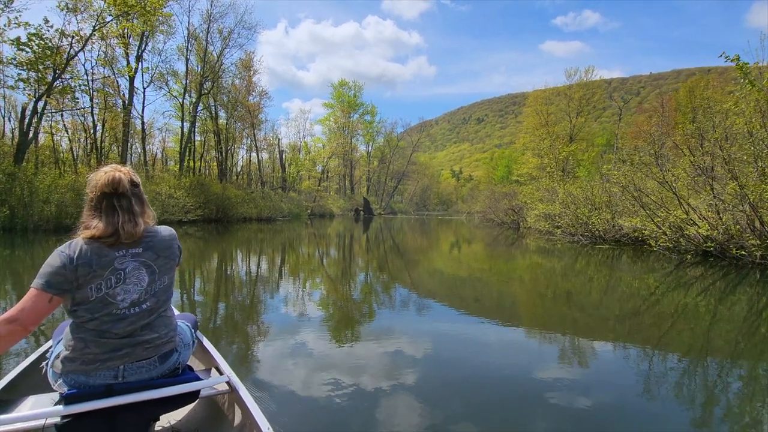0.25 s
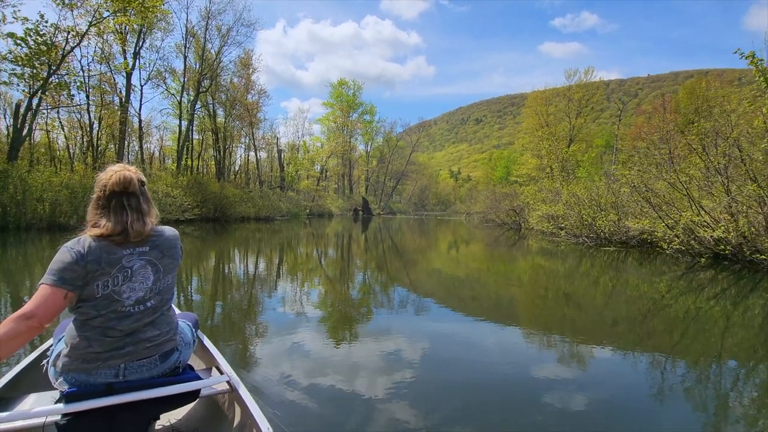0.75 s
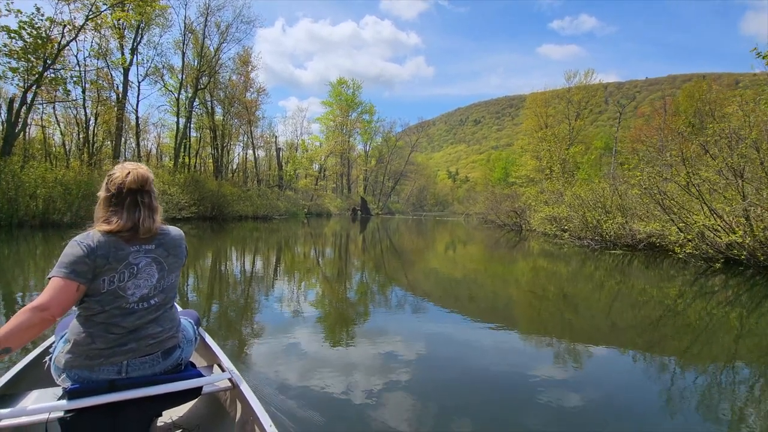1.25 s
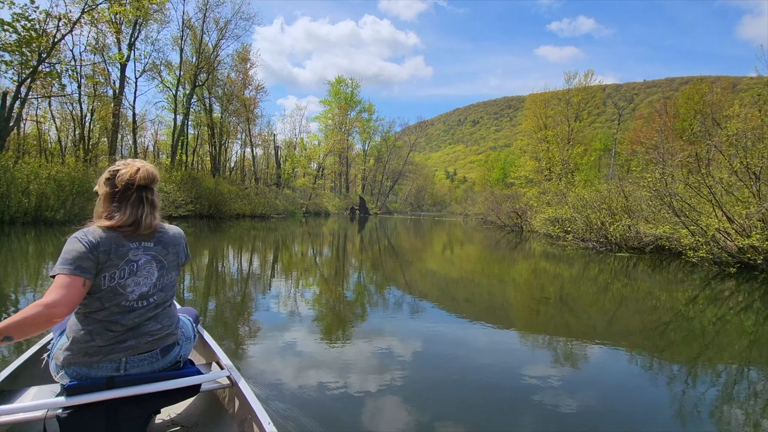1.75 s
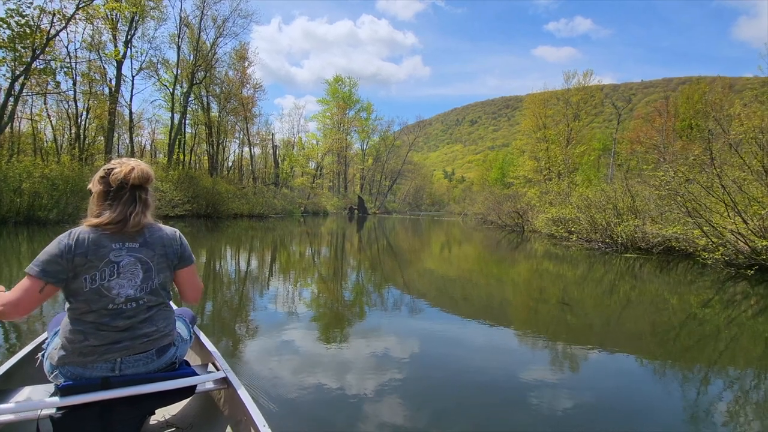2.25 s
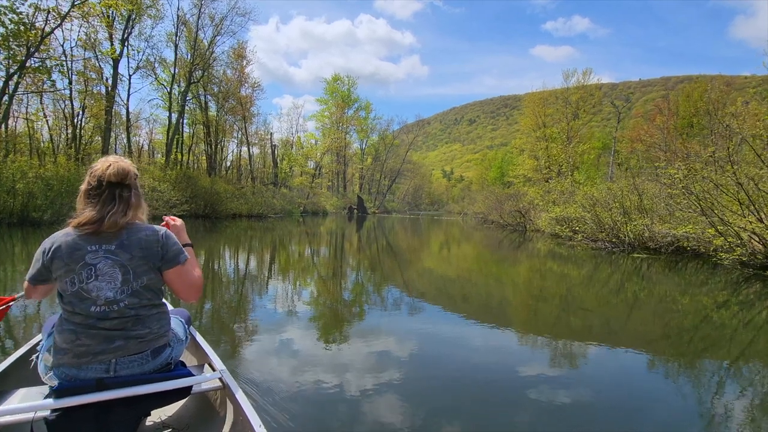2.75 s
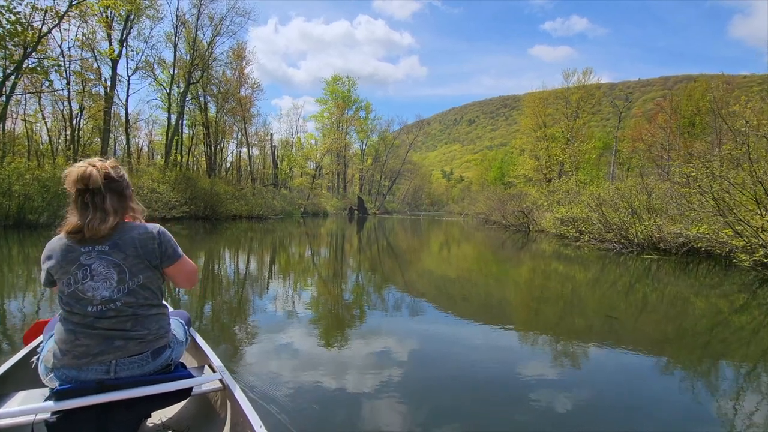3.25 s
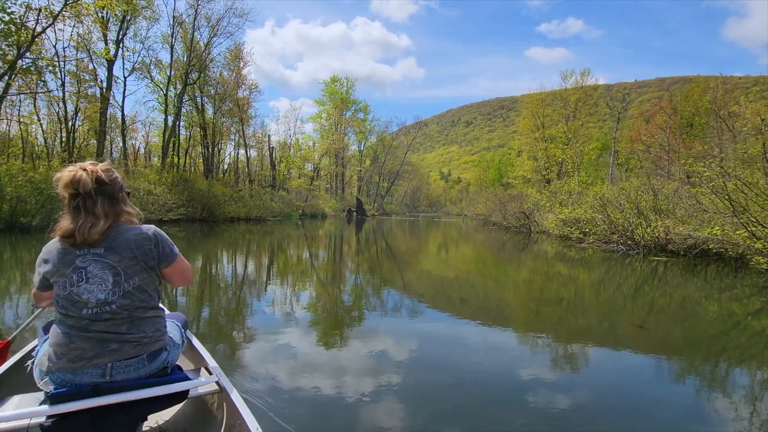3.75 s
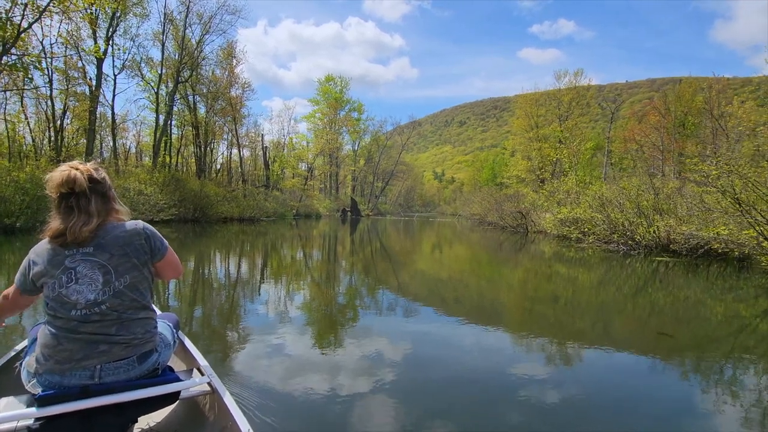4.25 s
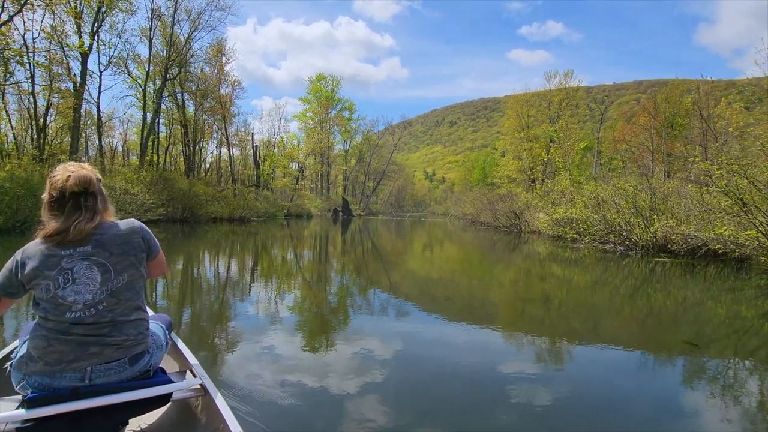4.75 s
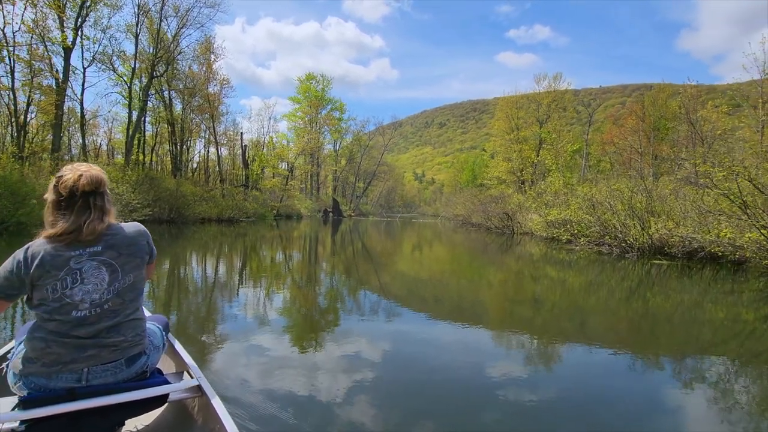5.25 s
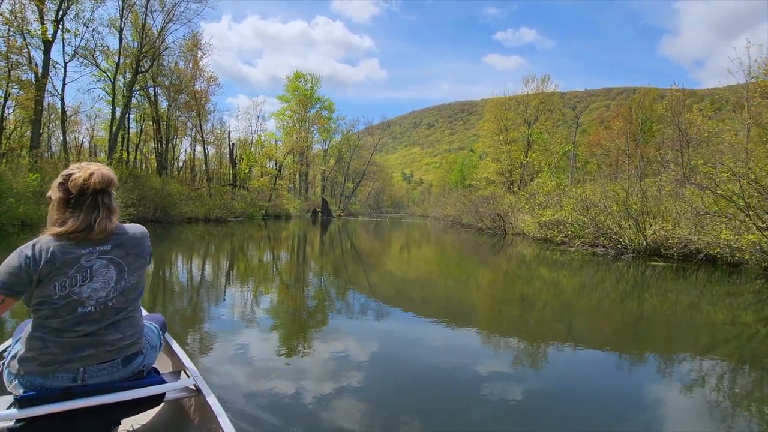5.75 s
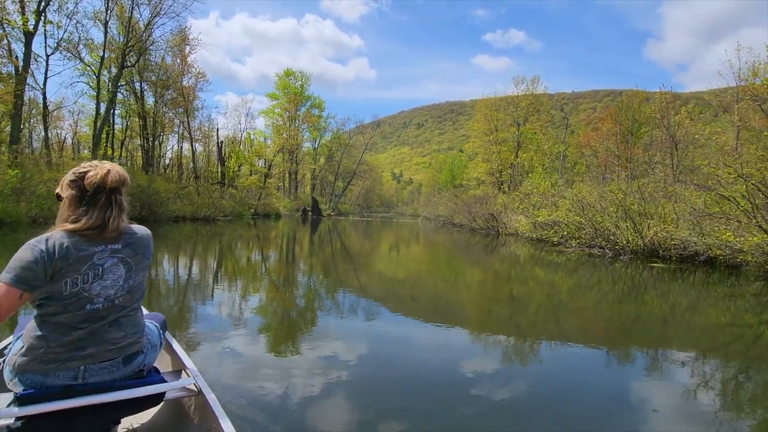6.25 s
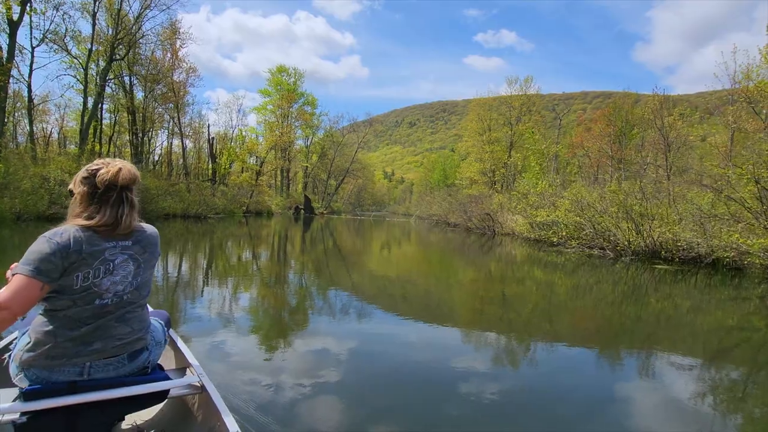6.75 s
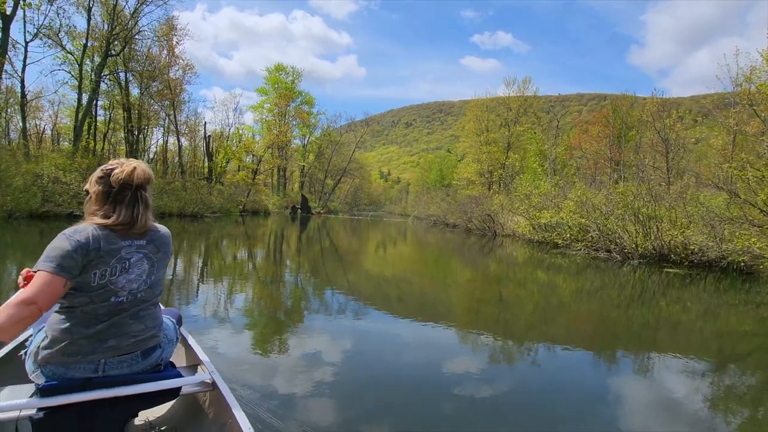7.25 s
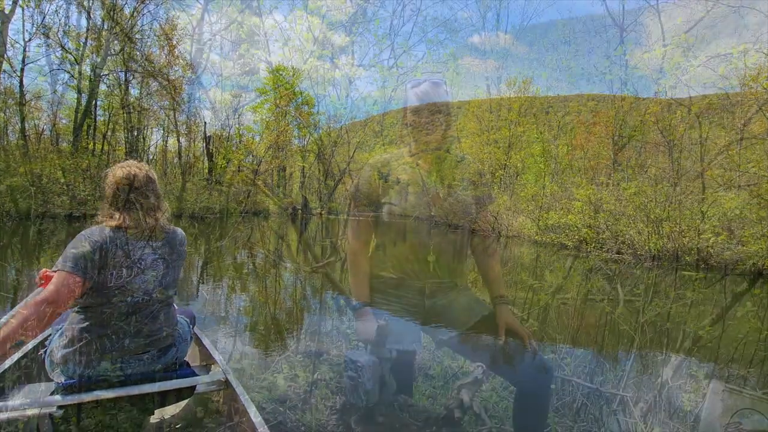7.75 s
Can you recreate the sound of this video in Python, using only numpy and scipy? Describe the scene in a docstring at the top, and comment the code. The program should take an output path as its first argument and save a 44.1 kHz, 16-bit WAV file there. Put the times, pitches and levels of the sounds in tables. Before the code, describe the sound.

A close sparrow sings chips, whistles and buzzes over a quiet creek, a farther blackbird rasps a trill, then low wind rumbles on the microphone.

```python
"""A sparrow sings close by on the right of a still creek between wooded banks, where a canoe drifts in spring.
Its notes are pitch-arced sines and two-pitch buzzes; a farther blackbird trills and chucks, small birds answer,
and all ring in the trees by convolution with scattered echoes and a dying noise tail.
Drops ring as bubbles and ticks crack at the paddle; gusts of low noise rumble on the microphone,
strongest near the end, over the valley's steady noise hush."""
import sys
import numpy as np
from scipy import signal
from scipy.fft import rfft, irfft, next_fast_len
from scipy.io import wavfile
from scipy.ndimage import uniform_filter1d

SR = 44100
rng = np.random.default_rng(int(sys.argv[2]) if len(sys.argv) > 2 else 0)


def store_wav(level_fs):
    """Save 16-bit WAV to argv[1]."""
    pcm = np.round(np.clip(np.atleast_2d(level_fs), -1, 1) * 32767)
    wavfile.write(sys.argv[1], SR, pcm.T.astype(np.int16))


N = 353108
TIME = np.arange(N) / SR

# Table levels are ahead of any pan and direct/echo gain; balance is left minus right.


def from_db(db):
    """Decibels to amplitude gain."""
    return 10 ** (np.asarray(db) / 20)


def rms_one(x):
    """Scale to unit power."""
    return x / np.sqrt(np.mean(x ** 2) + 1e-20)


def in_time(rows):
    """Interpolate (t/s, value) rows at every sample."""
    return np.interp(TIME, *np.transpose(rows))


def add(out, start_s, sound):
    """Mix a sound in, starting at start_s and cut at the end."""
    at = max(round(start_s * SR), 0)
    out[..., at:at + sound.shape[-1]] += sound[..., :max(N - at, 0)]


def panned(x, side_db):
    """Split the left-minus-right level difference evenly between the sides."""
    return x * from_db(np.array([[.5], [-.5]]) * side_db)


def placed(x, side_db, lead_ms):
    """A point source reaches the left port lead_ms earlier, and the two ports with unequal strength."""
    right = np.roll(x, round(lead_ms * SR / 1000))
    return panned(np.array([x, right]), side_db)


def coloured(x, spectrum):
    """Filter by (f/Hz, gain/dB) rows, falling off beyond both ends; rms 1."""
    hz, db = np.transpose(spectrum)
    size = next_fast_len(x.shape[-1])
    bins_hz = np.maximum(np.fft.rfftfreq(size, 1 / SR), 1)
    gain = from_db(np.interp(np.log(bins_hz), np.log(hz), db))
    gain *= np.minimum(bins_hz / hz[0], 1)
    gain *= np.minimum(hz[-1] / bins_hz, 1) ** 2
    return rms_one(irfft(rfft(x, size) * gain, size)[..., :x.shape[-1]])


def stereo_noise(spectrum, alike):
    """Coloured noise; the two sides share the fraction alike of its power before filtering."""
    white = rng.standard_normal((3, N))
    return coloured(np.sqrt(alike) * white[2] + np.sqrt(1 - alike) * white[:2], spectrum)


def waver(t, per_s):
    """Straight lines between unit-normal knots, per_s a second; holds the last of 512."""
    knots = rng.standard_normal(size=512)
    return np.interp(t * per_s, np.arange(len(knots)), knots)


def note_clock(length_s):
    """Seconds into a note, and the share of it that has passed."""
    t = np.arange(int(length_s * SR)) / SR
    return t, t / length_s


def swell(u, edge):
    """Sine-squared opening and closing, each over the share edge of a note."""
    return np.sin(np.pi / 2 * np.clip(np.minimum(u, 1 - u) / edge, 0, 1)) ** 2


def whistle(length_s, start_hz, middle_hz, end_hz, edge, unsteady):
    """A pure tone, rms 1, whose pitch follows a parabola through three points, with random quaver."""
    t, u = note_clock(length_s)
    arc = np.polyfit([0, .5, 1], [start_hz, middle_hz, end_hz], 2)
    hz = np.polyval(arc, u) * (1 + unsteady * waver(t, 250))
    return rms_one(swell(u, edge) * np.sin(2 * np.pi * np.cumsum(hz) / SR))


def buzz(length_s, start_hz, end_hz, swing_hz, pulse_hz, jitter, rasp, edge, overtone_db):
    """In each pulse the voice opens on a high pitch, flips to a low one and fades; rms 1."""
    t, u = note_clock(length_s)
    cycle = np.cumsum(pulse_hz * (1 + jitter * waver(t, 80))) / SR % 1
    flip = np.tanh(11 * (.5 - cycle))
    # level dips at the flip; the high half is the louder
    pulse = np.sin(np.pi * cycle) * (1 - .6 * (1 - flip ** 2)) * (1 + .15 * flip)
    swing = 0.79 * flip + .5 - cycle + rasp * waver(t, 900)
    hz = start_hz + (end_hz - start_hz) * u + swing_hz * swing
    phase = 2 * np.pi * np.cumsum(hz) / SR
    tone = np.sin(phase) + from_db(overtone_db) * np.sin(2 * phase)
    return rms_one(swell(u, edge) * pulse * tone)


def woods(x, t60_s, early_db):
    """Trunks and twigs scatter a sound: eight early echoes a side and a dense dying tail, cut at 1 s."""
    t = np.arange(SR) / SR
    decay = from_db(-60 * t / t60_s) * (1 - np.exp(-t / 0.0027))
    tail = rms_one(rng.standard_normal((2, SR)) * decay) / np.sqrt(SR)
    trunks = np.zeros((2, SR))
    for side in trunks:
        at = (rng.uniform(.003, .05, size=8) * SR).astype(int)
        side[at] = rng.standard_normal(size=8) / np.sqrt(8)
    return signal.fftconvolve(np.atleast_2d(x), tail + from_db(early_db) * trunks, axes=1)[:, :N]


def sparrow(buzz_fade_db=5.5, ragged_hz=750):
    """Four burr-chip-whistle phrases, then a flourish of buzzes and slurs that ends on a low buzz."""
    # phrases: chip t/s, chip level/dB, whistle delay/s, whistle length/s, whistle middle f/Hz, whistle rise/Hz
    phrases = [(1.313, -59, .02, 0.095, 7505, 120), (1.661, -52.5, 0.024, 0.075, 7330, 40),
               (1.897, -52.5, .033, .062, 7395, 348), (2.127, -53, 0.032, 0.066, 7320, 350)]
    # chip: length/s, start f/Hz, middle f/Hz, end f/Hz
    chip = (.012, 5250, 4690, 3350)
    # burr: length/s, start f/Hz, end f/Hz, pitch swing/Hz, pulse rate/Hz
    burr = (.054, 2500, 2610, 128, 109)
    # flourish tones: t/s, length/s, start f/Hz, middle f/Hz, end f/Hz, level/dB
    flourish_notes = [ (2.655, 0.04, 8230, 7460, 7230, -63), (2.687, 0.012, 6770, 5330, 4180, -59.5),
                      (2.709, .06, 5610, 5840, 5570, -55.5), (2.749, 0.011, 5700, 5380, 3520, -52),
                      (3.149, 0.035, 7700, 5900, 3600, -50.5)]
    # flourish buzzes: t/s, length/s, start f/Hz, end f/Hz, pitch swing/Hz, pulse rate/Hz, level/dB
    flourish_buzzes = [ (2.2425, .225, 4380, 4600, 610, 63.5, -57.7),
                       (2.522, 0.018, 4850, 4650, 150, 282, -58), (2.528, 0.035, 2307, 2950, 199, 261, -61),
                       (2.596, .065, 6240, 6670, 302, 200, -75.5),
                       (2.893, .155, 4380, 4380, 660, 184, -55.3),
                       (3.232, 0.17, 2470, 2340, 112, 77.4, -69)]
    # balance at the ports by pitch: f/Hz, left-right/dB
    side_by_pitch = [(2500, -11.5), (4500, -12.5), (6000, -13), (7300, -9)]
    burr_lead_s, burr_db, whistle_arch_hz = .098, -67, 106

    notes, buzzes = list(flourish_notes), list(flourish_buzzes)
    for s, db, delay_s, length_s, hz, rise_hz in phrases:
        ends_hz = hz - whistle_arch_hz   # mean of the whistle's two ends
        buzzes.append((s - burr_lead_s, *burr, burr_db))
        notes.append((s, *chip, db))
        notes.append((s + delay_s, length_s, ends_hz - rise_hz / 2, hz, ends_hz + rise_hz / 2, db))

    sung = []
    for s, length_s, start_hz, middle_hz, end_hz, db in notes:
        note = whistle(length_s, start_hz, middle_hz, end_hz, edge=0.45, unsteady=0.0062)
        sung.append((s, middle_hz, from_db(db) * note))
    for s, length_s, start_hz, end_hz, swing_hz, pulse_hz, db in buzzes:
        jitter = (pulse_hz / ragged_hz) ** 2   # fast buzzes are more ragged than slow ones
        note = buzz(length_s, start_hz, end_hz, swing_hz, pulse_hz, jitter,
                    rasp=.2, edge=.12, overtone_db=-38)
        t, u = note_clock(length_s)
        sung.append((s, start_hz, from_db(db + buzz_fade_db * (.5 - u)) * note))   # each buzz tires

    song = np.zeros((2, N))
    for s, hz, note in sung:
        side_db = np.interp(hz, *np.transpose(side_by_pitch))
        add(song, s, placed(note, side_db, lead_ms=0.24))
    echo = woods(song, t60_s=.7, early_db=-4)
    return from_db(-5.0) * song + from_db(-8.5) * panned(echo, side_db=2.5)


def blackbird():
    """A gurgle and a long rasping trill, built of overlapping two-pitch buzzes."""
    # voices: t/s, length/s, start f/Hz, end f/Hz, pitch swing/Hz, pulse rate/Hz, level/dB
    voices = [ (4.621, 0.049, 2270, 2260, 102, 155, -63), (4.755, 0.019, 4330, 4130, 720, 135.7, -57),
              (4.790, 0.62, 2776, 2689, 41.3, 61.6, -70), (4.787, 0.5, 3234, 3320, 200, 71.5, -75.5),
              (4.795, 0.89, 4855, 4820, 327, 155.3, -76), (5.601, 0.44, 4720, 4780, 542, 111.7, -70)]
    song = np.zeros(N)
    for s, length_s, start_hz, end_hz, swing_hz, pulse_hz, db in voices:
        note = buzz(length_s, start_hz, end_hz, swing_hz, pulse_hz,
                    jitter=0.09, rasp=.7, edge=0.055, overtone_db=-48)
        add(song, s, from_db(db) * note)
    direct = placed(song, side_db=-5.0, lead_ms=-.3)
    echo = woods(song, t60_s=2.5, early_db=-5.5)
    return from_db(-5.0) * direct + from_db(-3) * panned(echo, side_db=-7.0)


def chucks(start_hz=620, end_hz=480, breathy=1.0):
    """The blackbird's chucks: short ragged pulse trains, falling in pitch, and breath through its throat."""
    # calls: t/s, length/s, level/dB
    chuck_rows = [(5.177, 0.04, -60), (5.338, 0.034, -56.5), (5.547, .036, -58.5), (5.897, 0.042, -59.5)]
    # throat response: f/Hz, gain/dB
    throat = [(1000, -30), (1900, -1.5), (3000, 2.5), (4200, 8.5), (6000, -2), (7200, -18.5), (9500, -24.5),
              (13000, -57)]
    calls = np.zeros(N)
    for s, length_s, db in chuck_rows:
        t, u = note_clock(length_s)
        hz = (start_hz + (end_hz - start_hz) * u) * (1 + 0.034 * waver(t, 600))
        cycles = np.cumsum(hz) / SR
        pulses = rms_one(np.diff(np.floor(cycles), prepend=0))
        voice = coloured(pulses + breathy * rng.standard_normal(len(t)), throat)
        add(calls, s, from_db(db) * rms_one(np.sqrt(np.sin(np.pi * u)) * voice))
    direct = placed(calls, side_db=-6.0, lead_ms=-.33)
    echo = woods(calls, t60_s=.9, early_db=-11.0)
    return direct + from_db(-5.5) * panned(echo, side_db=-5)


def series(shape, rhythm, count):
    """One call repeated at an even pace, growing or fading; rows as for the lone whistles."""
    s, period_s, db, change_db, side_db = rhythm
    return [(s + k * period_s, *shape, db + k * change_db, side_db) for k in range(count)]


def far_calls():
    """Several birds call in series; one song is four dip-and-slur pairs and two plunges."""
    # call shapes: length/s, start f/Hz, middle f/Hz, end f/Hz
    hook, tsip, coo, seep = (.034, 6300, 6780, 6950), (0.013, 7300, 5800, 3800), (.22, 1760, 1820, 1910), (.034, 7450, 7470, 7520)
    dip, slur, plunge = (.04, 5200, 3900, 5100), (.042, 4200, 3100, 2300), (0.042, 6400, 4150, 2450)
    # rhythms: first t/s, period/s, first level/dB, change per call/dB, left-right/dB
    hook_rhythm, tsip_rhythm, coo_rhythm = (4.133, .418, -78.5, 5, -3), (4.678, .099, -78, 1.5, -2), (4.47, .59, -75.5, -2, -6)
    seep_rhythm, dip_rhythm = (6.026, .174, -79.5, -.3, 5), (6.058, .17, -72.5, -.4, -10)
    slur_rhythm, plunge_rhythm = (6.109, .168, -71.2, -.7, -8), (6.743, .138, -74, .5, -12)
    # lone whistles: t/s, length/s, start f/Hz, middle f/Hz, end f/Hz, level/dB, left-right/dB
    lone_whistles = [ (.038, 0.18, 4015, 3780, 3560, -82.5, -7), (1.15, 0.19, 4160, 3980, 4180, -83, -5),
                     (1.435, 0.28, 3910, 3635, 3670, -81, -2), (2.557, 0.033, 2940, 3135, 3290, -65.5, -11),
                     (4.153, .12, 2486, 2642, 2686, -74.5, -8), (4.247, 0.27, 2776, 2740, 2730, -81, -4),
                     (4.58, .017, 1500, 1440, 1430, -70.5, 5), (5.262, .17, 4714, 4542, 4536, -65.5, -9),
                     (5.633, .038, 8050, 7670, 7480, -85, 1.5), (5.705, 0.026, 5260, 5280, 4400, -70, -2),
                     (6.999, .058, 2850, 3920, 4660, -73, -12.5),
                     (7.032, .02, 4430, 3470, 2570, -73.5, -5.5)]
    callers = series(hook, hook_rhythm, count=2) + series(tsip, tsip_rhythm, count=5)
    callers += series(coo, coo_rhythm, count=3) + series(seep, seep_rhythm, count=3)
    song = series(dip, dip_rhythm, count=4) + series(slur, slur_rhythm, count=4)
    song += series(plunge, plunge_rhythm, count=2)
    return callers + song + list(lone_whistles)


def far_birds(clear_db=-64, quaver_hz=110, blur_range_db=18):
    """Thin whistles from both banks; the fainter a call, the more leaves smear it and the more it quavers."""
    clear, smeared = np.zeros((2, N)), np.zeros((2, N))
    for s, length_s, start_hz, middle_hz, end_hz, db, side_db in far_calls():
        hidden = np.clip((clear_db - db) / blur_range_db, .1, .95)
        note = whistle(length_s, start_hz, middle_hz, end_hz, edge=0.17,
                       unsteady=hidden * quaver_hz / middle_hz)
        t, u = note_clock(length_s)
        flicker = from_db(8.3 * hidden * waver(t, 180))
        note = panned(from_db(db) * rms_one(note * flicker), side_db)
        add(clear, s, np.sqrt(1 - hidden) * note)
        add(smeared, s, np.sqrt(hidden) * note)
    t, u = note_clock(.05)
    foliage = rms_one(rng.standard_normal((2, len(t))) * (1 - u) ** 2) / np.sqrt(len(t))
    calls = clear + signal.fftconvolve(smeared, foliage, axes=1)[:, :N]
    echo = woods(calls, t60_s=1.1, early_db=-5)
    return from_db(-0.5) * calls + from_db(-2.0) * echo


def paddle(rise_per_s=9, ring_cycles=49):
    """Each drop traps a bubble that rings, rises in pitch and dies; splashes are brief noise cracks."""
    # drops from the paddle: t/s, bubble start f/Hz, peak level/dB
    drop_rows = [(.077, 1940, -58.5), (2.808, 2550, -59.5), (3.19, 2560, -37.5), (3.201, 2800, -44),
                 (4.446, 2220, -47.5), (6.138, 2510, -55.5), (6.188, 2190, -53), (6.336, 2110, -59),
                 (6.453, 2000, -57), (7.171, 1760, -57), (7.193, 1690, -63), (7.781, 5000, -56.5)]
    # sharper splashes and ticks: t/s, peak level/dB
    tick_rows = [(.688, -67), (2.369, -53.5), (2.439, -63.5), (2.471, -55.5), (2.57, -59), (2.686, -59.5),
                 (3.207, -46), (4.447, -62.5), (5.998, -61), (6.93, -61), (7.6, -63)]
    # tick spectrum: f/Hz, gain/dB
    tick_colour = [(800, -16), (2500, 1.5), (5500, 5), (8000, -2), (11000, -16), (16000, -25.5)]
    drops, splashes = np.zeros(N), np.zeros((2, N))
    t, u = note_clock(0.084)
    for s, hz, db in drop_rows:
        ring = np.sin(2 * np.pi * np.cumsum(hz * (1 + rise_per_s * t)) / SR)
        decay = from_db(db - 60 * t * hz / ring_cycles)   # 60 dB down in ring_cycles of the start pitch
        add(drops, s, decay * np.tanh(t / 0.000082) ** 2 * ring)
    # a patter of faint ticks as the blade lifts
    patter = [(s, -68) for s in rng.uniform(7.52, 7.64, size=3)]
    for s, db in list(tick_rows) + patter:
        crack = coloured(rng.standard_normal((2, len(t))), tick_colour) * np.exp(-t / 0.0047)
        add(splashes, s, from_db(db) * crack / np.abs(crack).max())
    water = placed(drops, side_db=-5.5, lead_ms=0.41) + panned(splashes, side_db=8.5)
    return water + from_db(-17.0) * woods(water, t60_s=0.27, early_db=-5.0)


def wind(flutter_db=3, flutter_per_s=22, calm_eddy_db=-76, eddy_share_db=-22.5):
    """A fluttering breeze and single puffs buffet the microphone and shed smaller, higher eddies at each port."""
    # breeze, ahead of flutter: t/s, level/dB
    breeze_db = [(0, -61), (.4, -61), (.95, -52.5), (1.6, -68), (3.5, -68.5), (4.05, -58), (4.25, -68.5),
                 (5.55, -64), (5.92, -46), (6.38, -54), (7.05, -45), (7.78, -44.5), (8, -56.5)]
    # puffs: centre t/s, length/s, buffet level/dB, eddy level/dB
    puffs = [(0.305, 0.052, -53, -77), (0.884, 0.11, -49.5, -69), (5.075, 0.067, -56.5, -77),
             (6, 0.072, -37.5, -55), (6.155, .12, -48.5, -51), (6.485, 0.076, -41.5, -55.5),
             (6.616, 0.029, -42.5, -71), (6.735, 0.028, -42, -56.5), (6.842, 0.053, -40, -55.5),
             (6.999, 0.098, -41.5, -53), (7.212, 0.082, -41, -53), (7.387, 0.034, -40.5, -65),
             (7.59, 0.14, -44.5, -55.5)]
    # side that the wind comes from: t/s, left-right/dB
    wind_side = [(0, 2), (1.1, 4.5), (2, 0), (4, 2.5), (5.5, -1), (6.6, -2), (8, 1.5)]
    # noise spectra: f/Hz, gain/dB
    buffet_colour, eddy_colour = [(18, -25), (28, -12.5), (45, -0.5), (65, 1), (100, -3.5), (140, -13),
                                  (220, -29), (400, -57)], [(80, -15), (160, 6), (220, -0.5), (300, -9.5),
                                                  (420, -22.5), (700, -36), (1500, -49)]
    breeze = from_db(in_time(breeze_db) + flutter_db * waver(TIME, flutter_per_s))
    buffet_power = breeze ** 2
    eddy_power = from_db(calm_eddy_db) ** 2 + (from_db(eddy_share_db) * breeze) ** 2
    for s, length_s, buffet_db, eddy_db in puffs:
        puff = np.exp(-np.pi * ((TIME - s) / length_s) ** 2)
        buffet_power = buffet_power + from_db(buffet_db) ** 2 * puff
        eddy_power = eddy_power + from_db(eddy_db) ** 2 * puff
    buffet = stereo_noise(buffet_colour, alike=0.75)
    # level the noise so that the gust sets its strength
    buffet = buffet / np.sqrt(uniform_filter1d(buffet.mean(axis=0) ** 2, size=3000))
    side_db = in_time(wind_side)
    # eddies get a lean of their own on top of the common one
    eddies = panned(stereo_noise(eddy_colour, alike=0.18), side_db - 3)
    return panned(np.sqrt(buffet_power) * buffet + np.sqrt(eddy_power) * eddies, side_db)


def valley_hush():
    """Far hush of the valley: broad coloured noise, slowly changing in level."""
    # hush: t/s, level/dB ahead of the lift
    hush_db = [(0, -77), (3.2, -75.5), (6, -75.5), (7.6, -76.5), (8, -79)]
    # hush spectrum: f/Hz, gain/dB
    hush_colour = [(60, -1.5), (130, 3), (230, 9.5), (320, 3), (430, -2.5), (700, -1.5), (1200, -5),
                   (1800, -9.5), (3000, -15.5), (5800, -17.5), (7000, -25), (8300, -33), (10500, -45.5),
                   (16000, -36.5)]
    lift_db = 6.5
    return from_db(in_time(hush_db) + lift_db) * stereo_noise(hush_colour, alike=0.31)


def scene():
    """Birds, paddle and wind over the hush of the valley."""
    birds = sparrow() + blackbird() + chucks() + far_birds()
    return birds + paddle() + wind() + valley_hush()


def record(dry):
    """Steep elliptic low-pass: the top is cut."""
    cutoff_hz = 15800
    low_pass = signal.ellip(10, .1, 70, cutoff_hz, fs=SR, output="sos")   # 0.1 dB ripple, 70 dB stop
    return signal.sosfilt(low_pass, dry)


dry = scene()
out = record(dry)
store_wav(out)
```